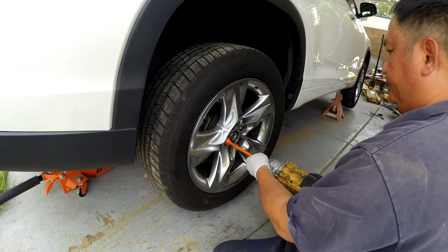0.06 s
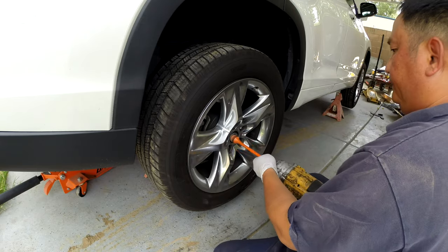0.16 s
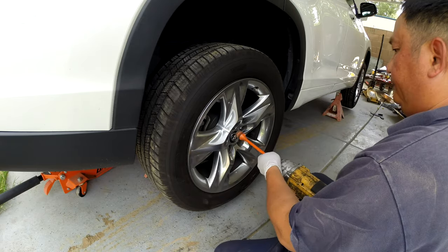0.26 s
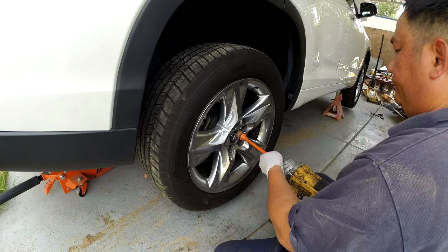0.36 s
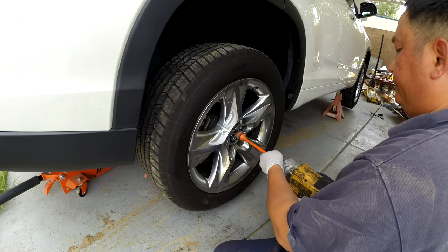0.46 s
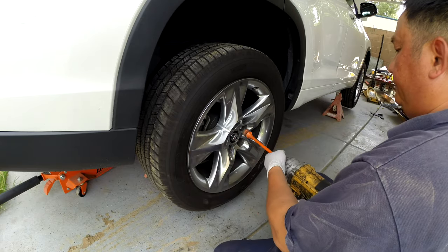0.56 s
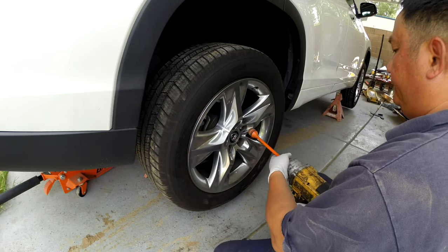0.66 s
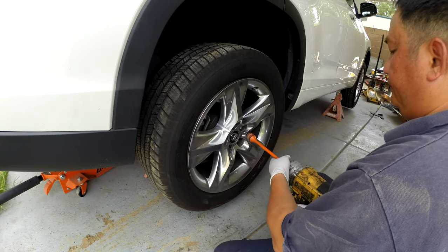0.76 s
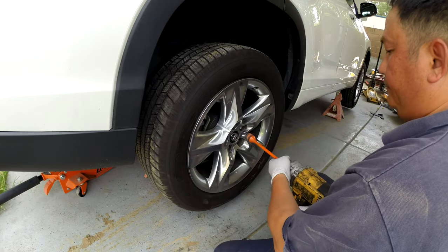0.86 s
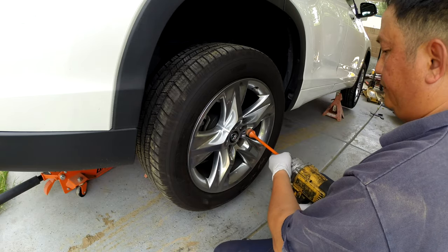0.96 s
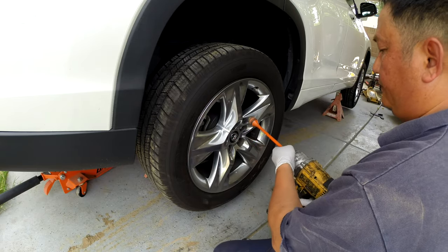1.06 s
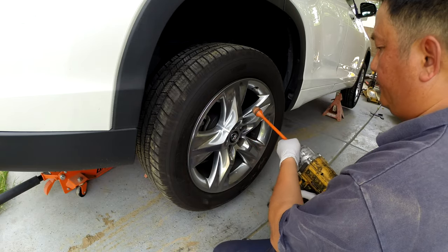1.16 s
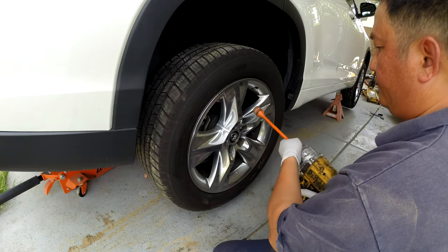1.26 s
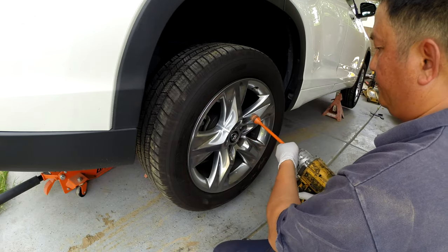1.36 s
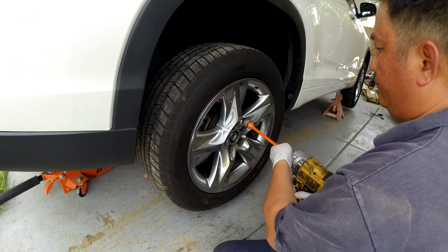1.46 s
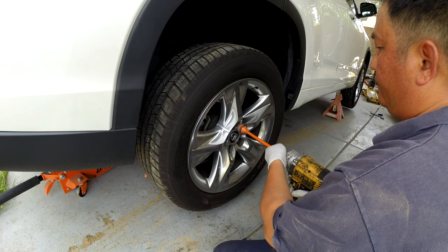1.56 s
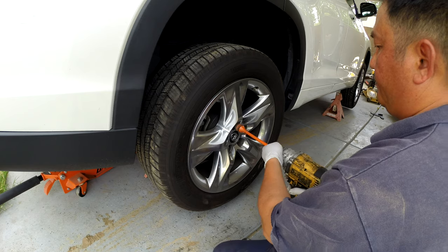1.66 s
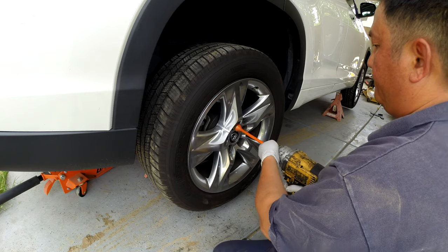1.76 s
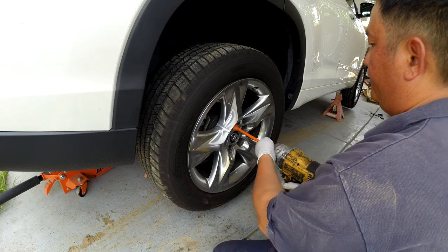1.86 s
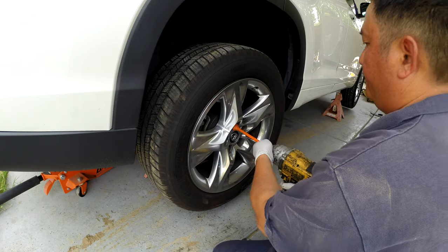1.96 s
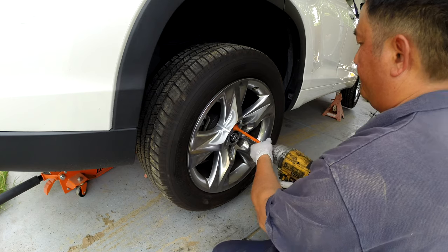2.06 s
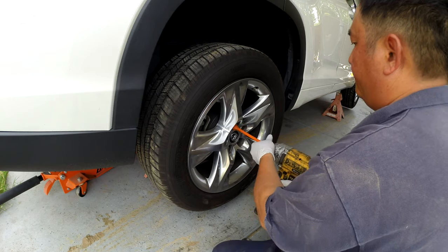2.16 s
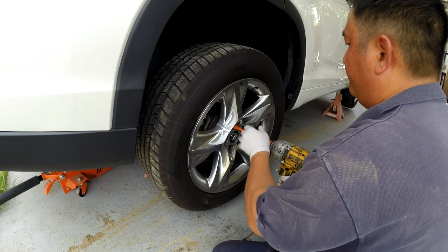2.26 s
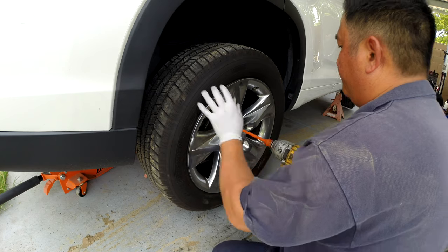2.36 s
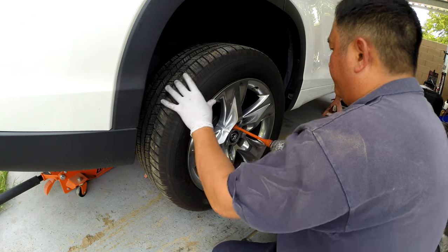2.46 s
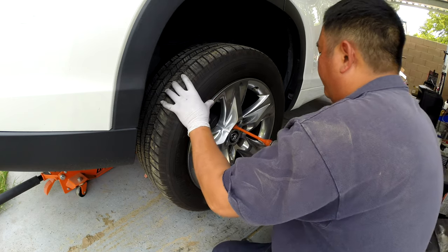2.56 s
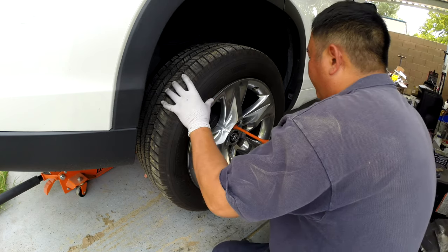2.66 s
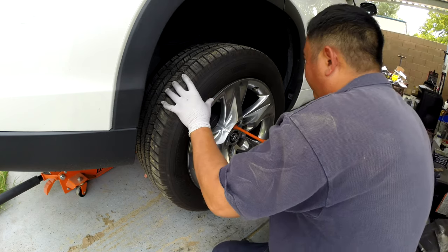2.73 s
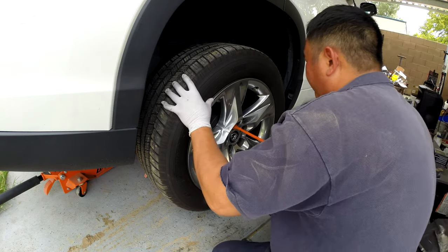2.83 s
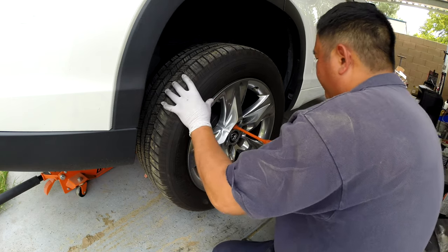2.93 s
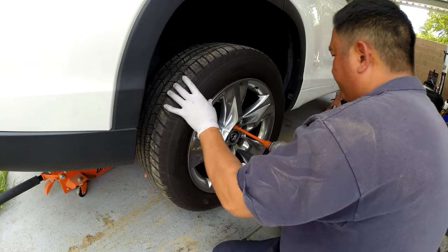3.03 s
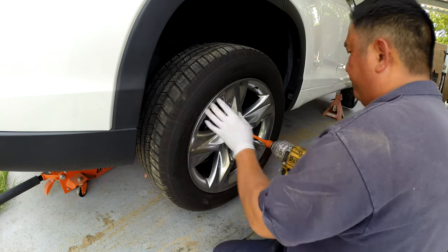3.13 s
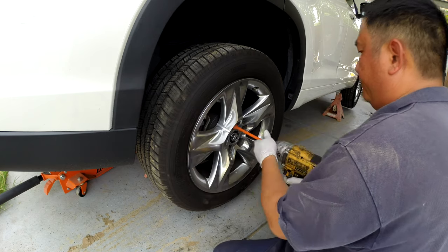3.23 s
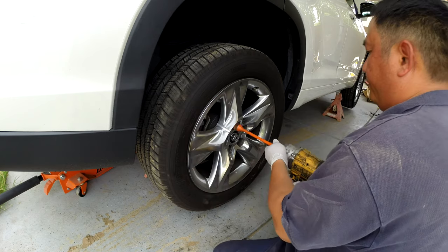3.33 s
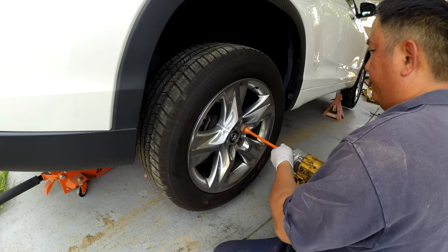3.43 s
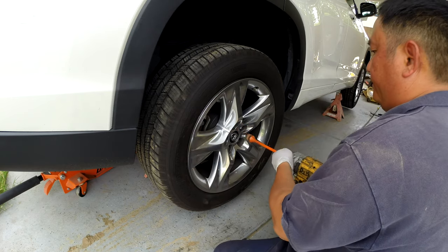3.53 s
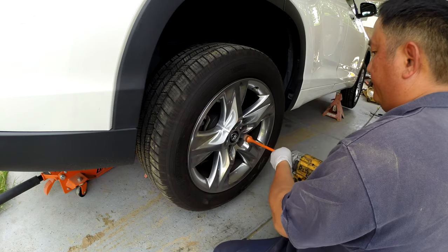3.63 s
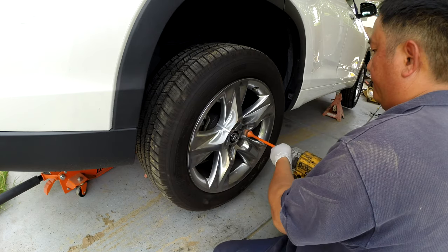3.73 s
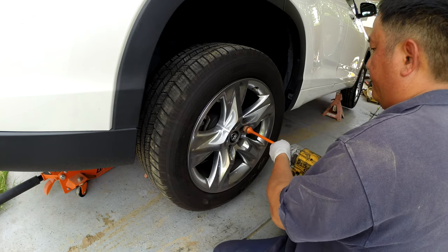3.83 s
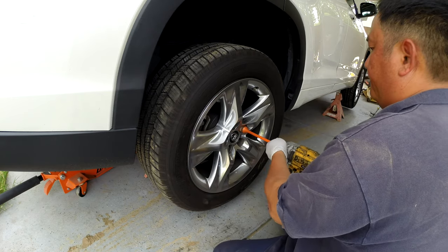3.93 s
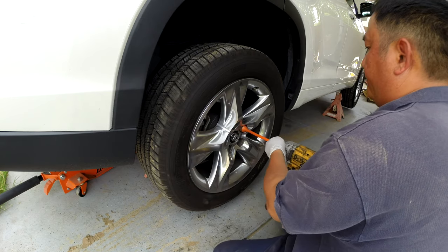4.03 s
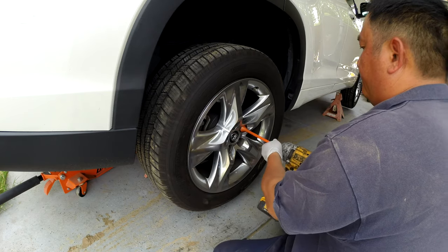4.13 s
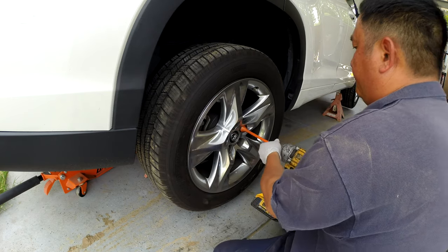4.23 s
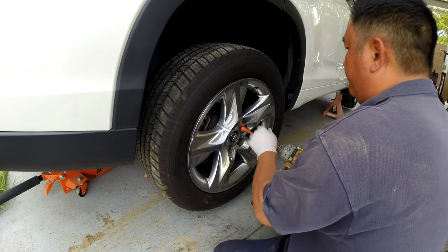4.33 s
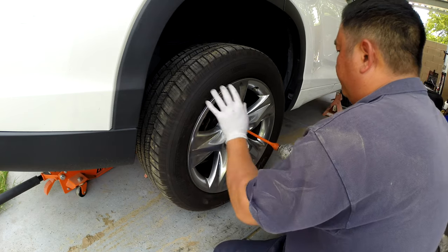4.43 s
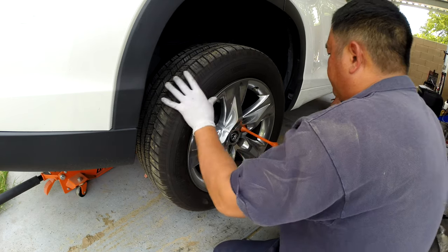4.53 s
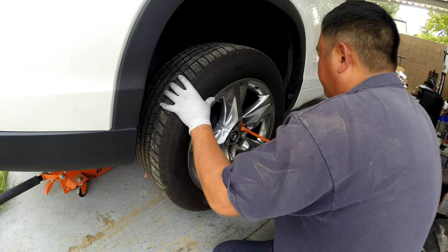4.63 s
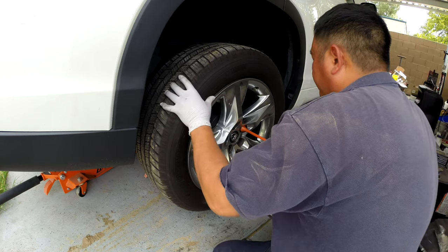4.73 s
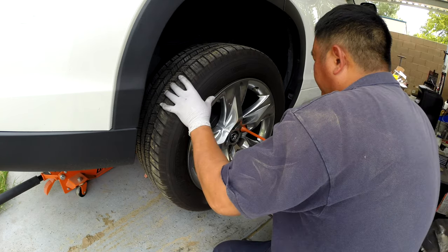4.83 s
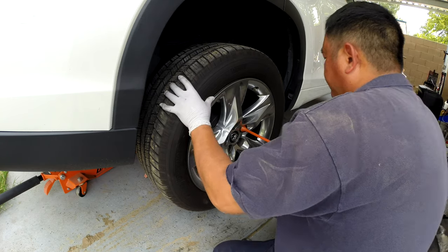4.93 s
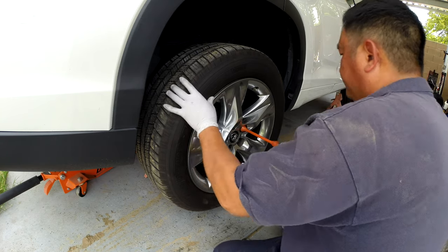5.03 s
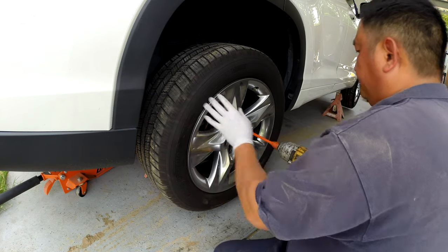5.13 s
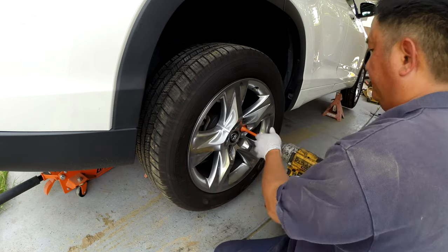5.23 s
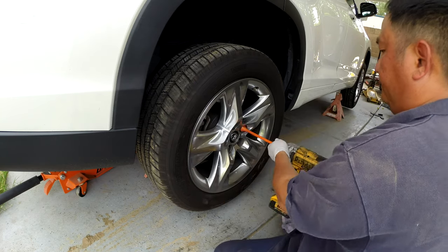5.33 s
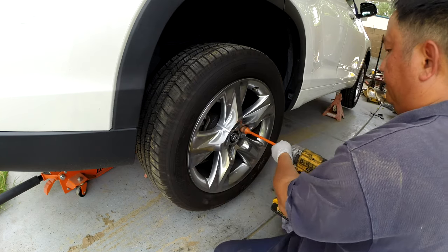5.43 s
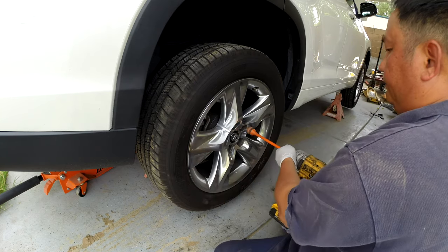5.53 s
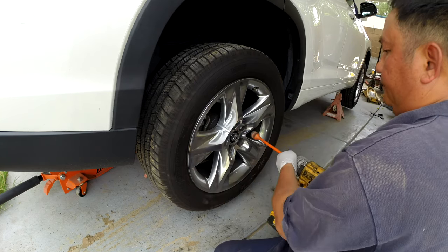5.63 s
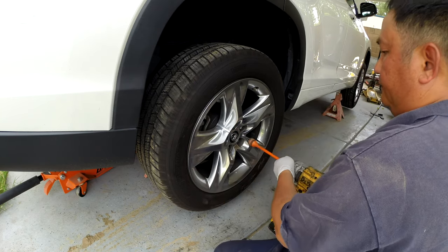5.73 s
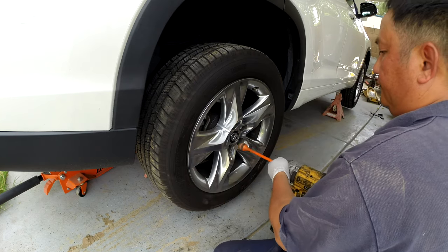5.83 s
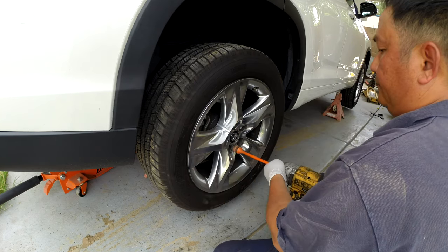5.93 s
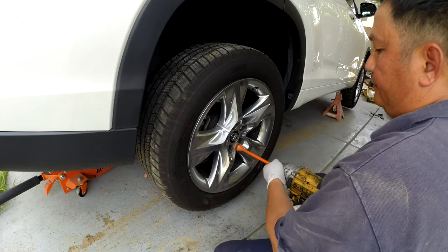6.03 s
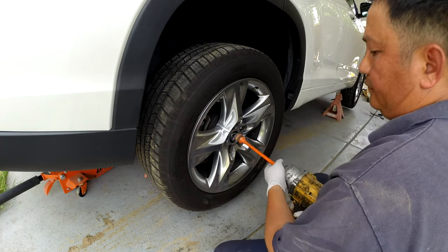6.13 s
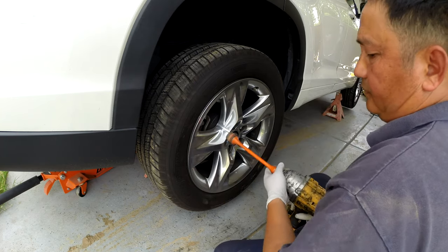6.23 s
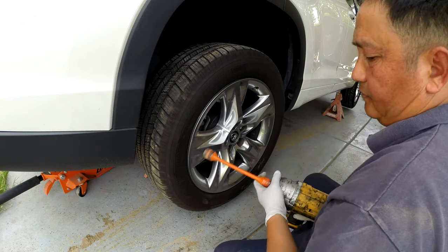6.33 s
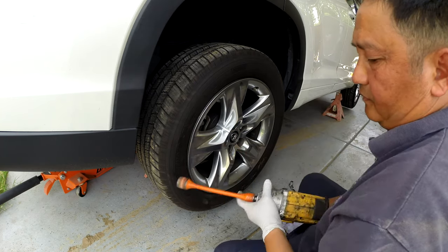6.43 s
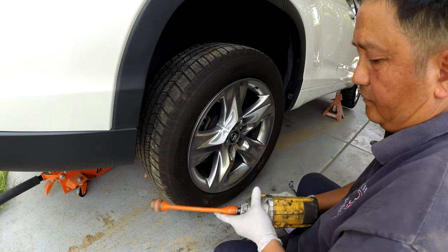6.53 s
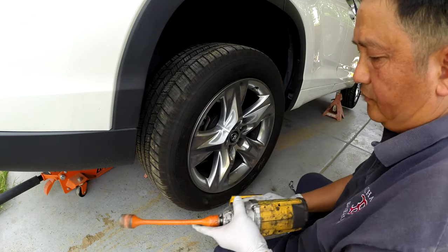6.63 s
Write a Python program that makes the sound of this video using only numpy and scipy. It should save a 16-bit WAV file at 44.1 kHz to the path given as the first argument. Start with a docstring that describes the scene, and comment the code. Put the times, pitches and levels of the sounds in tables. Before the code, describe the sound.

A quiet bed of outdoor hiss, low rumble and distant machine hum lies under a close view of a car wheel in an open, echoing carport. A small socket click and clank come at 0.15 s, a fainter tick at 0.7. From 1.7 to 2.3 s firm steel clicks, wheel thuds, a low tyre bump and little scrapes seat the socket. At 2.6 s the impact wrench starts softly, bites hard, then hammers fast and bright until 3.1, ending with a clack and echo tail. Light knocks follow at 3.4, then a stronger cluster at 3.9-4.2 with a solid thud and rubbing steel. Low air puffs buffet the microphone at 4.2-4.5. A second hammering run, 4.6-5.1 s, ends in four quick clacks. Knocks at 5.5 give way to faint ticks and handling until about 6.5.

```python
"""Tightening two wheel nuts

A cordless impact wrench drives two nuts through a long torque stick, under an open carport with dense echoes.
Low hum, rumble, hiss and a puff of air are tones and coloured noise. The socket ticks, rubs and knocks:
gritty bursts for the clicks, dying sine waves for wheel, tyre and socket. The hammer strikes about 38 times
a second: bursts of noise, shaped by the ringing of wheel and stick. Clacks follow as the motor brakes."""
import sys
import numpy as np
from scipy import signal
from scipy.fft import rfft, irfft
from scipy.io import wavfile
from scipy.ndimage import uniform_filter1d

SR = 44100
rng = np.random.default_rng(int(sys.argv[2]) if len(sys.argv) > 2 else 0)


def wav_record(signal):
    """Record a signal, one row per channel, as 16-bit PCM in the file named by sys.argv[1]."""
    frames = np.transpose(np.atleast_2d(signal))
    bounded = np.clip(frames, -1, 1)
    # unit amplitude maps onto the largest positive 16-bit level
    quanta = np.round(bounded * 32767).astype(np.int16)
    wavfile.write(sys.argv[1], SR, quanta)


N = 294572  # samples, about 6.7 s


def amp(db):
    """Turn decibels into gain."""
    return 10 ** (np.asarray(db) / 20)


def rms_one(x):
    """Scale to an rms of 1."""
    return x / np.sqrt(np.mean(x ** 2) + 1e-20)


def in_time(rows):
    """Gain at every sample from (time [s], level [dB]) rows; the end levels are held."""
    return amp(np.interp(np.arange(N) / SR, *np.transpose(rows)))


def at_hz(points, hz):
    """Read a table at the given frequencies, on a log-frequency axis."""
    table = np.array(points)
    return np.interp(np.log(np.maximum(hz, 1)), np.log(table[:, 0]), table[:, 1])


def causal_filter(x, gain_of_hz, size=32768):
    """Minimum-phase filter of the given shape and unit energy: nothing sounds early."""
    cepstrum = irfft(np.log(gain_of_hz(np.fft.rfftfreq(size, 1 / SR)) + 1e-6))
    # folding the cepstrum onto positive times gives minimum phase
    cepstrum[1:size // 2] *= 2
    cepstrum[size // 2 + 1:] = 0
    response = irfft(np.exp(rfft(cepstrum)))
    return signal.fftconvolve(x, response / np.linalg.norm(response))[:N]


def noise(colour):
    """Steady noise of the given colour, rms 1."""
    white = rfft(rng.standard_normal(N))
    gain = amp(at_hz(colour, np.fft.rfftfreq(N, 1 / SR)))
    return rms_one(irfft(white * gain, N))


def add(out, s, piece):
    """Mix a short sound in at time s."""
    at = int(s * SR)
    out[at:at + len(piece)] += piece[:N - at]


def even(x, width_hz):
    """Level out the chance humps of a noise's spectrum so it adds no colour; unit energy."""
    spectrum = rfft(x, 2 * len(x))
    width_bins = max(3, int(width_hz * 2 * len(x) / SR))
    power = uniform_filter1d(np.abs(spectrum) ** 2, width_bins)
    flat = irfft(spectrum / np.sqrt(np.abs(power) + 1e-12))[:len(x)]
    return flat / np.linalg.norm(flat)


def grit(size, grain_db):
    """Crowded tiny contacts whose force changes every half millisecond; rms 1."""
    force = np.repeat(amp(grain_db * rng.standard_normal(size // 22 + 1)), 22)[:size]
    return rms_one(force * rng.standard_normal(size))


def clicks(times, levels_db, colour, click_s):
    """Steel meets steel: a gritty burst that dies within milliseconds."""
    t = np.arange(int(.03 * SR)) / SR
    fade = np.exp(-t / click_s)
    touches = np.zeros(N)
    for s, db in zip(times, levels_db):
        burst = even(grit(len(t), grain_db=1.5) * fade, width_hz=600)
        add(touches, s, amp(db) * np.linalg.norm(fade) * burst)
    return causal_filter(touches, lambda f: amp(at_hz(colour, f)))


def ring(times, levels_db, modes, spread_db, detune=0.0, contact_s=0.000098):
    """Each touch rings every mode with its own strength; with detune, the grip shifts the pitch a little."""
    hz, db, t60 = np.transpose(modes)[:, :, None]
    t = np.arange(int(np.clip(t60.max(), .01, 1) * SR)) / SR
    out = np.zeros(N)
    for s, level_db in zip(times, levels_db):
        force, shift = rng.standard_normal((2, len(modes), 1))
        decay = np.exp(-np.log(1000) * t / t60)
        tones = np.sin(2 * np.pi * hz * (1 + detune * shift) * t)
        waves = amp(level_db + db + spread_db * force) * decay * tones
        mixed = waves[::2].sum(0) - waves[1::2].sum(0)  # neighbouring modes start in opposite directions
        add(out, s, mixed * (1 - np.exp(-t / contact_s)))
    return out


# colour of the outdoor hiss: (frequency [Hz], level [dB per Hz])
HISS_COLOUR = [(160, -18), (280, -4), (425, -4.5), (564, -7), (761, -8), (1340, -12.5), (2210, -17.5),
               (3830, -20), (12000, -34.5), (15000, -52)]
# colour of the low rumble: (frequency [Hz], level [dB per Hz])
RUMBLE_COLOUR = [(13, -35.5), (22, -13.5), (59, 4.5), (75, -3), (129, -2), (162, -7), (177, -11.5),
                 (194, -5), (217, -10), (243, -13), (330, -22.5), (430, -54), (730, -120)]
# how hiss and rumble sink and recover: (time [s], level [dB])
BACKGROUND_LEVEL = [(0, -1), (.15, -7), (.42, -4.5), (.7, 0), (2.5, 0), (3.3, -8.5), (3.85, -5.5), (4.2, 3),
                    (5.4, -3), (5.7, -4), (5.95, -0.5), (6.68, -0.5)]
# hum of a distant machine: (frequency [Hz], level [dB])
HUM = [(72, -57.5), (118, -58.5), (191, -56.5), (1150, -74.5)]
# swells of the puff of air on the microphone: (time [s], level [dB])
PUFF_LEVEL = [(4.15, -57), (4.22, -20.5), (4.28, -41), (4.36, -20.5), (4.41, -35), (4.47, -27), (4.55, -32),
              (4.66, -83)]
# colour of the puff: (frequency [Hz], level [dB per Hz])
PUFF_COLOUR = [(12, -40.5), (20, -5.5), (38, 3), (54, 0.5), (115, -11), (146, -10.5), (186, -19),
               (260, -28.5), (340, -56.5), (570, -120)]
HISS_DB, RUMBLE_DB = -57.0, -47  # where BACKGROUND_LEVEL reads 0 dB


def background(waver=0.1):
    """Hiss and rumble that sink and swell together, a hum of wavering tones, and the low puff of air."""
    t = np.arange(N) / SR
    slow = [(1, 0), (3, -6), (10, -40), (40, -120)]  # wavering: (frequency [Hz], level [dB per Hz])
    hum = np.zeros(N)
    for hz, db in HUM:
        strength = np.sqrt(2) * (1 + waver * noise(slow))
        hum += amp(db) * strength * np.sin(2 * np.pi * hz * t + noise(slow))
    outdoors = amp(HISS_DB) * noise(HISS_COLOUR) + amp(RUMBLE_DB) * noise(RUMBLE_COLOUR)
    puff = in_time(PUFF_LEVEL) * noise(PUFF_COLOUR)
    return hum + in_time(BACKGROUND_LEVEL) * outdoors + puff


# how long the carport's echoes take to fall 60 dB: (frequency [Hz], time [s])
CARPORT_T60 = [(100, 0.38), (600, 0.41), (1500, 0.6), (3000, 0.54), (7000, 0.4), (15000, 0.32)]


def carport(x, gap_s=.006, early_db=4.0, early_s=0.043):
    """Dense random echoes: strong early ones from floor and car, then a tail that dies band by band."""
    t = np.arange(SR) / SR
    hz, edges = np.fft.rfftfreq(SR, 1 / SR), np.geomspace(20, SR / 2, 19)
    white = rfft(rng.standard_normal(SR))
    tail = np.zeros(SR)
    for lo, hi in zip(edges, edges[1:]):
        band = irfft(white * (hz >= lo) * (hz < hi), SR)
        t60 = at_hz(CARPORT_T60, np.sqrt(lo * hi))
        tail += band * np.exp(-np.log(1000) * t / t60)
    early = 1 + amp(early_db) * np.exp(-t / early_s)
    echoes = tail * (t > gap_s) * early
    return signal.fftconvolve(x, even(echoes, width_hz=160))[:N]


# spells when the hands shift on the tool: (start [s], end [s])
HANDLING = [(2.05, 2.24), (3.54, 3.56), (4.08, 4.2), (5.77, 5.95), (6.22, 6.4)]
# colour of the dry click of steel on steel: (frequency [Hz], level [dB per Hz])
CLICK_COLOUR = [(150, -7), (400, -2.5), (1000, -2.5), (2300, 7), (3600, 4.5), (5500, -1.5), (7500, -9.5),
                (10000, -19.5), (15000, -35)]
# colour of the wheel's dense, quickly damped clank: (frequency [Hz], level [dB per Hz])
CLANK_COLOUR = [(300, -13.5), (750, -10), (920, -0.5), (1040, -8), (1180, 1), (1330, -6), (1510, 0.5),
                (1750, -5.5), (2000, -11), (2400, -10), (3200, -20), (6000, -44)]
TICKS_PER_S, TICK_DB, TICK_SPREAD_DB = 18.0, -55.5, 2.0


def handling(clank_db=-5.0):
    """Faint, unevenly spaced ticks of the loose socket on the stick, each with a little clank."""
    slots = np.concatenate([np.arange(t0, t1, 1 / TICKS_PER_S) for t0, t1 in HANDLING])
    late, force = rng.standard_normal((len(slots), 2)).T
    times = slots + np.abs(late) / (3 * TICKS_PER_S)
    db = TICK_DB + TICK_SPREAD_DB * force
    ticks = clicks(times, db, CLICK_COLOUR, click_s=0.0052)
    return ticks + clicks(times, db + clank_db, CLANK_COLOUR, click_s=0.006)


# colour of steel rubbing on steel, carried by the wheel: (frequency [Hz], level [dB per Hz])
SCRAPE_COLOUR = [(150, -7), (430, 10), (670, 16), (880, 3.5), (1500, 6.5), (2600, 3.5), (4800, -6),
                 (7500, -18), (8900, -15), (10500, -31.5), (15000, -33.5)]
# the socket rubs and rattles over a nut: (time [s], length [s], level [dB])
SOCKET_SCRAPES = [(0.0, 0.11, -54), (2.06, 0.09, -47), (2.1, 0.04, -35.5), (2.232, 0.04, -42.5),
                  (2.28, 0.05, -46), (2.573, 0.054, -45), (4.01, 0.096, -36), (4.172, 0.055, -32),
                  (4.349, 0.033, -39.5), (4.488, 0.14, -53.5), (5.75, 0.11, -56), (6.38, 0.13, -58.5)]


def scrapes(rubs, grain_db=2.0):
    """Steel rubs on steel: short swells of tiny contacts, from (time [s], length [s], level [dB]) rows."""
    rubbing = np.zeros(N)
    for s, length, db in rubs:
        swell = np.hanning(max(int(length * SR), 64))
        add(rubbing, max(s, 0), amp(db) * swell * grit(len(swell), grain_db))
    return causal_filter(rubbing, lambda f: amp(at_hz(SCRAPE_COLOUR, f)))


# the socket is pushed home: (time [s], level [dB])
SHOVES = [(1.935, -31.5), (2.255, -37)]
# ringing tones of tyre and wheel: (frequency [Hz], level [dB], time to fall 60 dB [s])
TYRE_MODES = [(40, -16.5, 0.23), (57, -6, 0.17), (116.2, 3.5, 0.082), (154, -1.5, 0.27), (259.6, 2, 0.068),
              (346, -3.5, 0.18)]


def shoves():
    """The push that seats the socket rocks the tyre, which answers with low, short tones."""
    return ring(*np.transpose(SHOVES), TYRE_MODES, spread_db=2.0)


# socket touching nut and wheel, before the trims in knocks():
# (time [s], click peak [dB], thud [dB], clank [dB])
KNOCKS = [(0.1436, -39, -60, -43.5), (0.171, -27.5, -27, -29.5), (0.692, -45, -64, -70),
          (1.733, -21.5, -16.5, -21.5), (1.8767, -20.5, -40, -35), (1.9066, -22, -36.5, -35.5),
          (1.933, -20.5, -21.5, -21.5), (2.1246, -28, -34.5, -29.5), (2.1856, -37, -47.5, -47.5),
          (2.2548, -33.5, -28, -40), (2.3121, -36, -37.5, -41.5), (3.3762, -35.5, -53, -44.5),
          (3.3926, -29, -24.5, -32), (3.4444, -42.5, -34.5, -41.5), (3.8888, -24.5, -21, -30),
          (3.9955, -19.5, -8.5, -21.5), (4.018, -21, -31.5, -43.5), (4.0456, -25.5, -33, -37.5),
          (4.0576, -21, -40.5, -27), (4.2004, -27, -24, -43.5), (4.3819, -36.5, -36.5, -51),
          (4.5585, -25.5, -37, -31), (5.5057, -28, -60, -44), (5.5303, -27, -25.5, -32.5),
          (5.574, -29.5, -29, -32), (5.7894, -53.5, -54, -50), (5.851, -60, -62, -50.5),
          (6.2846, -42, -58, -62), (6.4612, -47.5, -54.5, -49)]
# ringing tones of the wheel: (frequency [Hz], level [dB], time to fall 60 dB [s])
THUD_MODES = [(540, -7, .03), (630, 0, .027), (700, -1, .03), (668, -16, .14), (790, -9, .025)]
# ringing tones of the steel socket: (frequency [Hz], level [dB], time to fall 60 dB [s])
PING_MODES = [(8830, -8, .022), (8990, -8, .022), (14080, -24, .07)]
BOUNCE_S, BOUNCE_DB = 0.025, -17.5  # each knock bounces once
PING_DB, FIRM_CLICK_DB = -39.5, -20  # ping level for a firm click whose thud is equally strong
PING_GROWTH = 1.6  # dB of ping per dB of click
PING_DAMPING = 0.93  # dB of ping lost per dB of thud over click: a square hit clamps the socket


def knocks(click_db=-5.5, thud_db=5.5, clank_db=2.5):
    """The socket goes on and off: click, wheel thud and clank, a thin ping if it only glances; then a bounce."""
    bounces = np.array(KNOCKS) + [BOUNCE_S, BOUNCE_DB, BOUNCE_DB, BOUNCE_DB]
    times, peak, thud, clank = np.vstack([KNOCKS, bounces]).T
    squareness = np.maximum(thud - peak, -16)
    ping = PING_DB + PING_GROWTH * (peak - FIRM_CLICK_DB) - PING_DAMPING * squareness
    thuds = ring(times, thud + thud_db, THUD_MODES, spread_db=.5, detune=.008, contact_s=.0006)
    clanks = clicks(times, clank + clank_db, CLANK_COLOUR, click_s=0.0056)
    pings = ring(times, ping, PING_MODES, spread_db=1.0, detune=.004)
    return clicks(times, peak + click_db, CLICK_COLOUR, click_s=0.0047) + thuds + clanks + pings


# the anvil clacks in the socket, before the trim in braking(): (time [s], level [dB])
BRAKE_CLACKS = [(3.1346, -7), (5.1331, -13.5), (5.1453, -11), (5.1709, -6.5), (5.1894, -10)]
# colour of the braking clack: (frequency [Hz], level [dB per Hz])
CLACK_COLOUR = [(150, -15.5), (450, 4), (670, 8.5), (950, 0), (2500, 7), (4500, 4), (6500, -0.5),
                (9000, -0.5), (12000, -11.5), (15000, -16)]


def braking(trim_db=-7.0):
    """As the motor brakes, the anvil clacks in the socket: short gritty bursts."""
    return amp(trim_db) * clicks(*np.transpose(BRAKE_CLACKS), CLACK_COLOUR, click_s=0.0053)


BEAT_S = 0.02603  # time between blows at full speed
SPIN_UP_BLOWS, JITTER_S = 2.2, 0.0005


def blow_times(start, stop, lag_s, limp_s):
    """The hammer starts slow and settles to a near-even beat; its two jaws limp a little."""
    k = np.arange(round((stop - start - lag_s) / BEAT_S + .5))
    spin_up = lag_s * (1 - np.exp(-k / SPIN_UP_BLOWS))
    limp = limp_s * (-1) ** k
    return start + k * BEAT_S + spin_up - limp + JITTER_S * rng.standard_normal(len(k))


SEATING_BLOWS, SEATING_DB = 2, -16  # the first blows only seat the nut; level of the very first
BITE_DB, STEADY_DB, SETTLE_BLOWS = -0.5, -5.0, 2.5  # the next bites hardest, then the force settles
JAW_DB = 0.4  # added for one jaw, taken off for the other


def blow_forces(count, seating_rise_db):
    """Strength of each blow in dB: soft while the nut seats, hardest as it bites, then steady."""
    k = np.arange(count)
    settling = np.exp((SEATING_BLOWS - k) / SETTLE_BLOWS)
    tight = STEADY_DB + (BITE_DB - STEADY_DB) * settling + JAW_DB * (-1) ** k
    return np.where(k < SEATING_BLOWS, SEATING_DB + seating_rise_db * k, tight)


def recolour(x, spread_db, count=24):
    """No two blows land alike: each has its own broad humps and dips."""
    hz = np.fft.rfftfreq(len(x), 1 / SR)
    hump_places = np.linspace(0, np.sqrt(SR / 2), count)
    humps = np.interp(np.sqrt(hz), hump_places, rng.standard_normal(count))
    return irfft(rfft(x) * amp(spread_db * humps), len(x))


def hammer_blow(jolt, tension, rise_s=0.003, chatter_s=0.01, rebound_s=0.021, rebound_db=-6.5, gears_db=-12.5):
    """Loose steel joints chatter while the stick winds up, then the hammer rebounds and the gears grind on."""
    t = np.arange(len(jolt)) / SR
    repeat, fade_s = .15, .003
    contacts = grit(len(t), grain_db=3.2)
    chatter = np.sqrt(repeat) * jolt + np.sqrt(1 - repeat) * contacts  # the jolt is alike in every blow
    past_chatter = np.maximum(t - chatter_s * tension, 0)
    wind_up = np.minimum(t / (rise_s * tension), 1) * np.exp(-t / 0.014 - past_chatter / fade_s)
    late = t - rebound_s - 0.00075 * rng.standard_normal()
    rebound_gain = amp(rebound_db + 2 * rng.standard_normal())
    rebound = rebound_gain * (late > 0) * np.exp(-np.abs(late) / 0.0018)
    gears = amp(gears_db) * np.sqrt(1 - t / t[-1])
    blow = even(chatter * wind_up + contacts * (tension * rebound + gears), width_hz=1000)
    return recolour(rms_one(blow), spread_db=2.0)


# a run of the hammer on each nut: (first blow [s], trigger released [s],
# time lost while the motor spins up [s], limp of the two jaws [s], gain per seating blow [dB])
RUN_A = (2.6146, 3.115, 0.0183, 0.0013, 1.4)
RUN_B = (4.5822, 5.107, 0.016, 0.0003, 7.0)
# colour of the hammering on each nut: (frequency [Hz], level [dB per Hz])
COLOUR_A = [(40, -31), (120, -16.5), (200, -18.5), (342, -8), (600, -5), (1050, -5.5), (1480, -1),
            (2140, -1), (3220, -1.5), (4600, -1), (5800, -8), (7450, -12), (9050, -13.5), (14200, -22),
            (15500, -31)]
COLOUR_B = [(40, -22.5), (120, -11.5), (276, -13), (420, -8), (727, -6.5), (1000, -7), (1500, -5),
            (2400, 0), (3600, -5), (4840, -3), (5750, -10.5), (8480, -12), (14200, -26), (15500, -33)]
# resonances of wheel and stick, clamped at each nut: (frequency [Hz], width [Hz], boost [dB])
RINGS_A = [(340, 35, 4.5), (653, 30, 10.5), (1370, 8.1, 8), (1466, 7.2, 11), (2400, 180, 3),
           (3170, 310, 4.5), (4030, 330, 0.5), (4020, 270, 3), (8640, 400, 8.5), (14050, 500, 5.5)]
RINGS_B = [(342, 18, 4.8), (674, 40, 15), (845.5, 35, 7), (1454, 19, 7.6), (2340, 58, 3), (2970, 170, 6.7),
           (3450, 61, 3), (3956, 130, 4.4), (8260, 400, 2), (14150, 500, 6.6)]
WIND_UP_BLOWS = 2.4  # blows are short and sharp until the stick is wound up
# the wheel thuds most around the blow that bites (before the trim for each nut)
THUD_BITE_DB, THUD_STEADY_DB, THUD_SETTLE_BLOWS = -13.5, -28.5, 2.5
GRIND_DELAY_S, GRIND_S = 0.007, 0.062  # the nut grinds round: delay after the first blow, length


def hammering(run, colour, rings, crack_db, thud_db, tyre_db, rock_db, grind_db):
    """Blows heard through wheel and stick also thump wheel and tyre; a seating nut grinds and rocks the tyre."""
    *timing, seating_rise_db = run
    times = blow_times(*timing)
    k = np.arange(len(times))
    peak = blow_forces(len(times), seating_rise_db)
    wound = 1 - np.exp(-(k + 1) / WIND_UP_BLOWS)
    near_bite = np.exp(-np.abs(k - SEATING_BLOWS) / THUD_SETTLE_BLOWS)
    thud = THUD_STEADY_DB + (THUD_BITE_DB - THUD_STEADY_DB) * near_bite
    jolt = rng.standard_normal(int(.032 * SR))
    force = np.zeros(N)
    for s, db, tension in zip(times, peak, wound):
        add(force, s, amp(db + crack_db) * hammer_blow(jolt, tension))

    def wheel_and_stick(f):
        boost = sum(db / (1 + (2 * (f - hz) / width) ** 2) for hz, width, db in rings)
        return amp(at_hz(colour, f) + boost)

    clatter = causal_filter(force, wheel_and_stick)
    grinding = scrapes([(times[0] + GRIND_DELAY_S, GRIND_S, grind_db)])
    rocking = ring(times[:SEATING_BLOWS], peak + rock_db, TYRE_MODES, spread_db=0.5)
    wheel = ring(times, thud + thud_db, THUD_MODES, spread_db=2.5)
    tyre = ring(times, peak + tyre_db, TYRE_MODES, spread_db=1.0)
    return clatter + grinding + rocking + wheel + tyre


def scene(wrench_room_db=-6.0, knock_room_db=-9.5):
    """Wrench and socket under the roof, over the background; echoes differ from one working position to the next."""
    first_nut = hammering(RUN_A, COLOUR_A, RINGS_A,
                          crack_db=-14.0, thud_db=-2.0, tyre_db=-33.0, rock_db=-16.5, grind_db=-22.5)
    second_nut = hammering(RUN_B, COLOUR_B, RINGS_B,
                           crack_db=-13.5, thud_db=0.0, tyre_db=-41.0, rock_db=-24.5, grind_db=-24.0)
    clacks = braking()
    socket = knocks() + handling() + scrapes(SOCKET_SCRAPES) + shoves()
    wrench_echoes = amp(wrench_room_db) * (carport(first_nut) + carport(second_nut + clacks))
    socket_echoes = amp(knock_room_db) * carport(socket)
    direct = first_nut + second_nut + clacks + socket
    return (direct + wrench_echoes + socket_echoes + background())[None]


CUTOFF_HZ = 15350


def record(dry):
    """The highest peaks are rounded and the top of the treble is cut."""
    rounded = 1.1 * np.tanh(dry / 1.1)
    low_pass = signal.ellip(10, .1, 80, CUTOFF_HZ, fs=SR, output="sos")
    return signal.sosfilt(low_pass, rounded)


dry = scene()
out = record(dry)
wav_record(out)
```